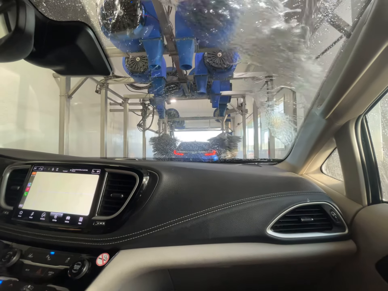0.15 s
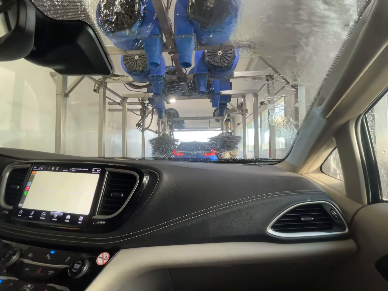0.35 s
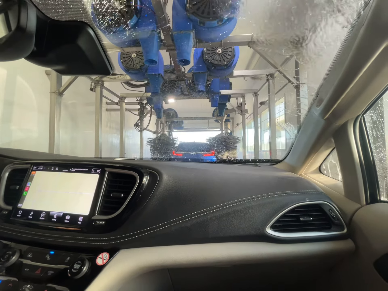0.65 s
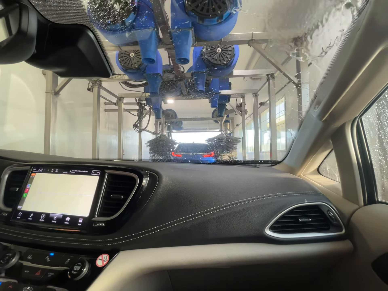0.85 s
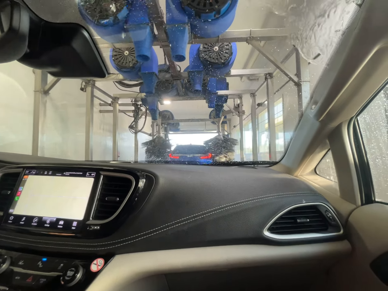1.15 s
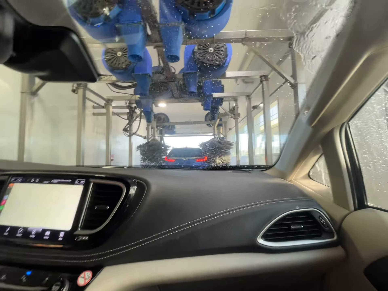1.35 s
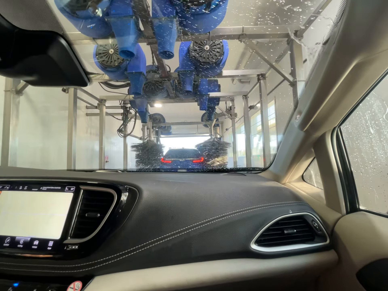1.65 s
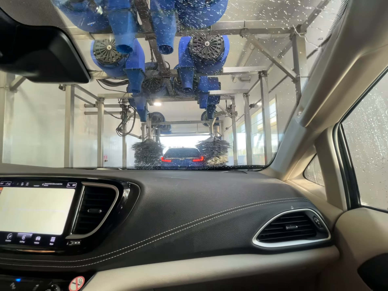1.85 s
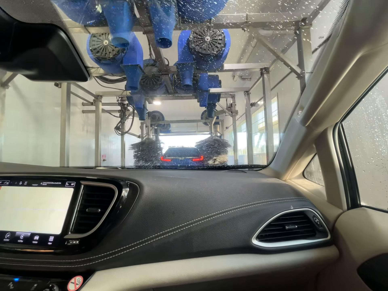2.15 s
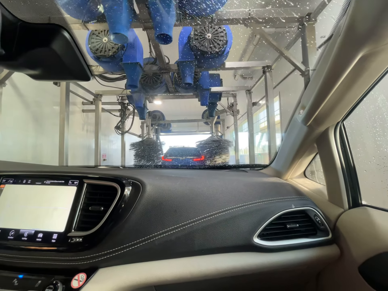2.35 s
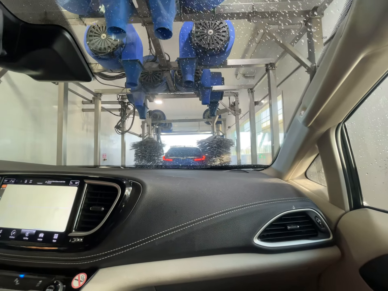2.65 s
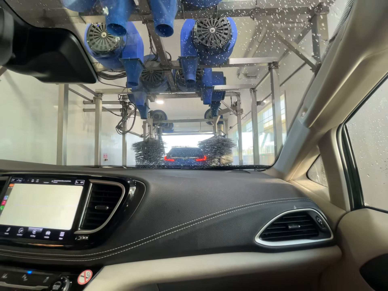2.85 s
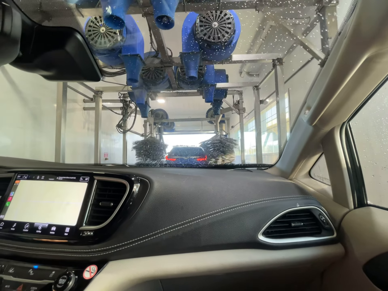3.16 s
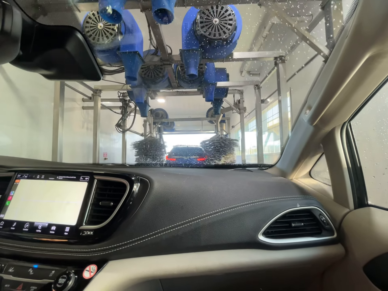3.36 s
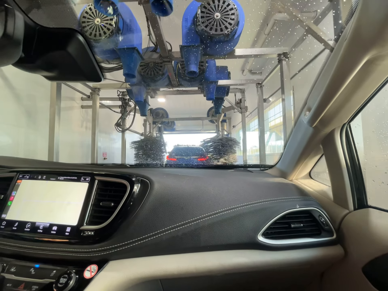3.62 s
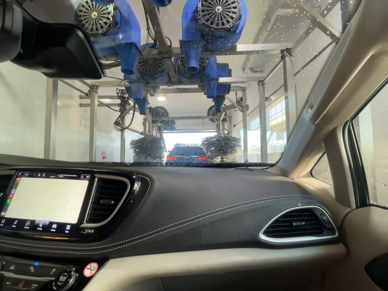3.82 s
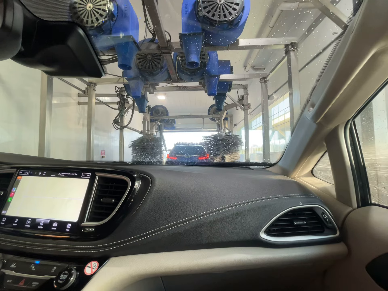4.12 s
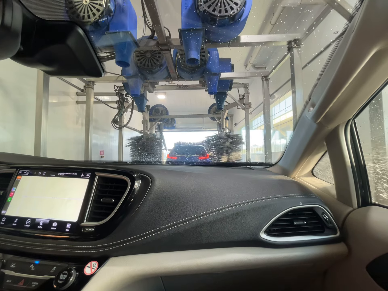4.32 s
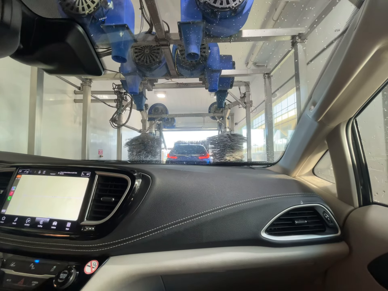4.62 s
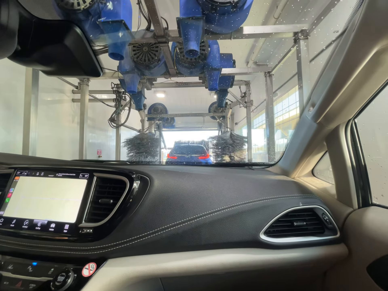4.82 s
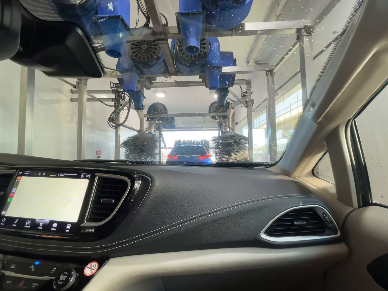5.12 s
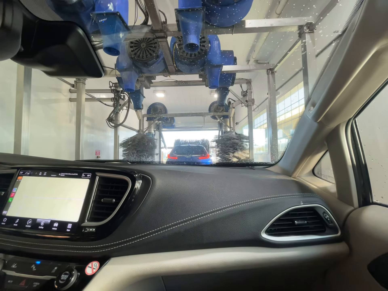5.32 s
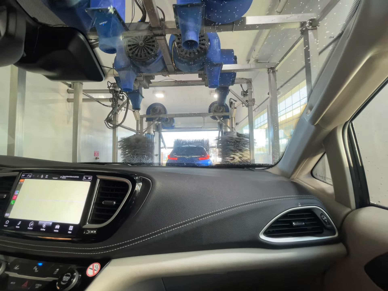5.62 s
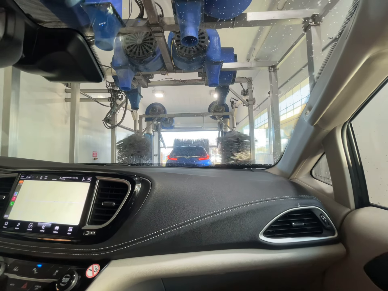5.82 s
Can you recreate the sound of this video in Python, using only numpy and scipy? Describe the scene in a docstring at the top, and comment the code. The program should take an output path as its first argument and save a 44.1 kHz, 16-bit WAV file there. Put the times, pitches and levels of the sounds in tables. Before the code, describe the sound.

The air dryers of an automatic car wash are heard from inside a closed car. From the start there is a steady rush, dulled by the glass, over a low, gusty cabin rumble. A fine hiss of air and spray lies on top, along with a faint two-tone fan whine that swells and fades. The jets drum deeply on the body panels, softly at first, then growing from about 1.3 seconds to full strength near 2.5 seconds. At that point one nozzle sweeps across the windscreen in a brief, brighter whoosh; the whine lifts for a moment and the roar deepens until just after 3 seconds. The drumming stays strong as the air moves onto the roof, continuing to the end at about 6 seconds. Faint drops tick on the windscreen near 0.3 seconds, between 1 and 2, from 4 to 4.6, and just before the end.

```python
"""Inside a car rolling under the dryer blowers of a car wash.
The air jets drum on the body panels and shake the cabin; the drumming grows as they reach the
windscreen and roof. Their rush comes dulled through the glass with a fine hiss and a faint fan whine.
One nozzle sweeps across the glass in a brief whoosh, and a few blown drops tick on the windscreen."""
import sys
import numpy as np
from scipy import signal
from scipy.fft import rfft, irfft, next_fast_len
from scipy.io import wavfile
from scipy.ndimage import uniform_filter1d, minimum_filter1d

SR = 44100
rng = np.random.default_rng(int(sys.argv[2]) if len(sys.argv) > 2 else 0)


def waveform_to_disk(signal):
    """Save audio, clipped to [-1, 1], as 16-bit WAV at the path in sys.argv[1]."""
    frames = np.transpose(np.atleast_2d(signal))
    scaled = np.clip(frames, -1, 1) * 32767
    samples = np.round(scaled).astype(np.int16)
    wavfile.write(sys.argv[1], SR, samples)


N = 263718
GUST_HZ = 4


def from_db(db):
    """Decibels to gain."""
    return 10 ** (np.asarray(db) / 20)


def rms_one(x):
    """Scale to rms 1."""
    return x / np.sqrt(np.mean(x ** 2) + 1e-20)


def in_time(rows):
    """The columns of an automation table at every sample."""
    times, *columns = np.transpose(rows)
    return [np.interp(np.arange(N) / SR, times, column) for column in columns]


def at_place(place, levels_db):
    """A level that glides between its values for bonnet, windscreen, roof front and mid-roof."""
    return np.interp(place, range(len(levels_db)), levels_db)


def swell(start_s, attack_s, hold_s, release_s):
    """An envelope from 0 to 1 and back."""
    corners = np.cumsum([start_s, attack_s, hold_s, release_s])
    return np.interp(np.arange(N) / SR, corners, [0, 1, 1, 0])


def noise(gain_at):
    """Noise of rms 1, shaped by a gain given as a function of frequency."""
    size = next_fast_len(N)
    hz = np.maximum(np.arange(size // 2 + 1) * SR / size, 1)
    spectrum = rfft(rng.standard_normal(size)) * gain_at(hz)
    return rms_one(irfft(spectrum, size)[:N])


def broad_noise(colour):
    """Turbulence with a smooth spectrum and nothing above its last point."""
    points_hz, points_db = np.transpose(colour)
    return noise(lambda hz: from_db(np.interp(np.log(hz), np.log(points_hz), points_db, right=-np.inf)))


def resonant_noise(centre_hz, width_hz):
    """Turbulence ringing in one resonance with steep skirts."""
    return noise(lambda hz: 1 / (1 + ((hz ** 2 - centre_hz ** 2) / (hz * width_hz * np.sqrt(2))) ** 2))


def drift(rate_hz):
    """A slow random wander of rms 1."""
    return noise(lambda hz: 1 / (1 + (hz / rate_hz) ** 2))


def resonate(x, centre_hz, width_hz):
    """Pass a sound through one resonance; rms 1."""
    radius = np.exp(-np.pi * width_hz / SR)
    feedback = [1, -2 * radius * np.cos(2 * np.pi * centre_hz / SR), radius * radius]
    return rms_one(signal.lfilter([1, 0, -1], feedback, x))


def steady(x, seconds):
    """Hold the slow level of a noise at 1 and keep its fast flutter."""
    return x / np.sqrt(uniform_filter1d(x ** 2, int(seconds * SR)) + 1e-12)


def crossover(x, hz):
    """Split a sound into its lows and highs."""
    lows = signal.sosfiltfilt(signal.butter(2, hz, fs=SR, output="sos"), x)
    return lows, x - lows


def drop_ticks():
    """Each drop bursts into a short spatter with a bright ring of its own and a duller glass ping."""
    # drops hitting the windscreen: (time [s], level [dB], ring [Hz])
    drops = [(.338, -54.5, 7600), (1.089, -56, 7400), (1.475, -59, 7000), (1.578, -54, 7900),
             (1.876, -54, 7400), (4.018, -48, 8300), (4.204, -53, 7900), (4.462, -54, 7600),
             (4.555, -53, 7450), (5.719, -50, 7600), (5.798, -53.5, 8300), (5.911, -55.5, 7700)]
    trim_db, ping_db = -7.0, 6.5
    tick_t60_s, ping_t60_s = .055, .05
    splash_band = signal.butter(2, [4000, 9500], "band", fs=SR, output="sos")
    ticks, t = np.zeros(N + SR), np.arange(SR // 8) / SR
    for time_s, db, ring_hz in drops:
        spatter = rng.standard_normal(len(t))
        splash = rms_one(signal.sosfilt(splash_band, spatter))
        tick = from_db(-60 * t / tick_t60_s) * (resonate(spatter, ring_hz, width_hz=550) + splash)
        ping = from_db(ping_db - 60 * t / ping_t60_s) * resonate(spatter, 5100, width_hz=700)
        start = int(time_s * SR)
        ticks[start:start + len(t)] += from_db(db + trim_db) * (tick + ping)
    treble_cut = signal.butter(12, 9400, fs=SR, output="sos")
    return signal.sosfilt(treble_cut, ticks[:N] + 1e-18)


def jet_edge():
    """The leading edge of the sweeping jet tears across the glass in a band of bright noise."""
    # colour of the edge: (frequency [Hz], level [dB per Hz])
    colour = [(1000, -20), (1450, -7), (1780, 4), (2300, -18)]
    envelope = swell(start_s=2.38, attack_s=.14, hold_s=.12, release_s=.08)
    return from_db(-41.5) * envelope * broad_noise(colour)


def air_hiss(lift_db):
    """Air and fine spray slide over the glass, brighter the harder they blow."""
    # colour of the fine turbulence: (frequency [Hz], level [dB per Hz])
    colour = [(1200, -19), (2050, -3.5), (2450, 0.5), (2750, -3), (3100, -3), (3600, -7.5), (4500, -13.5),
              (5800, -20), (7000, -24), (8500, -28), (9500, -34.5), (10300, -50.5), (12000, -55),
              (15500, -61)]
    # air and spray on the glass: (time [s], level [dB])
    spray = [(0, -42), (0.7, -43), (1.35, -43), (1.8, -43), (2.38, -43), (3.1, -42), (3.55, -40.5),
             (4.6, -40.1), (5.2, -40.5), (5.98, -41.5)]
    mean_db, brighten_db_per_db = -41, .1
    level_db = in_time(spray)[0] + lift_db
    dull, bright = crossover(broad_noise(colour), hz=3200)
    treble_db = brighten_db_per_db * (level_db - mean_db)
    flutter_db = .51 * drift(rate_hz=14)
    return from_db(level_db + flutter_db) * (dull + from_db(treble_db) * bright)


def fan_whine():
    """Two groups of fans at constant speed come and go; both swell as a nozzle points at the cabin."""
    # blade tones, smeared by the hall: (pitch [Hz], width [Hz])
    fans = [(709.2, 2.7), (739, 19)]
    # each whine as the car passes the fans: (time [s], lower tone [dB], higher tone [dB])
    levels = [(0, -46, -39.5), (0.6, -46, -43), (0.95, -43, -37), (1.3, -46, -38), (1.55, -38, -44),
              (2.2, -40, -43), (2.5, -43.5, -41.5), (3.05, -38.5, -45.5), (3.4, -45.5, -42.5),
              (4.2, -43, -41.5), (4.6, -36, -38), (5.2, -43, -38.5), (5.98, -42, -42)]
    beam_db = 7.5 * swell(start_s=2.58, attack_s=.046, hold_s=.15, release_s=.07)
    tones = [steady(resonant_noise(hz, width), seconds=.2) for hz, width in fans]
    return sum(from_db(db + beam_db) * tone for db, tone in zip(in_time(levels), tones))


def air_rush(place, lift_db):
    """The broad roar of the jets, coloured by the windows and deeper while they hit the windscreen."""
    # the rush as the glass lets it in: (frequency [Hz], level [dB per Hz])
    colour = [(150, -21.5), (275, -4), (305, 2), (430, -1.5), (560, -6.5), (740, -7.5), (830, -14),
              (1100, -12.5), (1260, -16), (1700, -17.5), (2000, -24), (2600, -30), (4500, -69),
              (9000, -100)]
    # resonances of side windows and trim: (frequency [Hz], width [Hz], level against the rush [dB])
    windows = [(301.5, 13, -19.5), (316, 22, -15), (436, 45, -15.5), (591, 21, -17.5), (663, 20, -19),
               (823, 21, -19.5), (895, 49, -21), (1049, 6.3, -27), (1392, 130, -19.5), (1466, 64, -24),
               (1730, 220, -21)]
    # low shelf on the roar: (time [s], gain [dB])
    roar = [(0, -2), (1.2, -1), (2.08, -1.5), (2.3, 0.5), (2.7, 2.5), (3.1, 2.5), (4.1, -0.1), (5.3, -0.9),
            (5.98, -2)]
    # base level by landing place: (bonnet [dB], windscreen [dB], roof front [dB], mid-roof [dB])
    levels = (-27, -25, -25, -25)
    ringing = sum(from_db(db) * resonant_noise(hz, width) for hz, width, db in windows)
    air = steady(broad_noise(colour) + ringing, seconds=.42)
    lows, highs = crossover(air, hz=460)
    roar_db, = in_time(roar)
    flutter_db = .41 * drift(rate_hz=7.7)
    return from_db(at_place(place, levels) + lift_db + flutter_db) * (highs + from_db(roar_db) * lows)


def cabin_rumble(place, lift_db):
    """The jets rock the closed cabin as a whole, in gusts."""
    # colour of the shaken cabin: (frequency [Hz], level [dB per Hz])
    colour = [(14, -36), (28, -35), (36, -28.5), (47, -8.5), (57, -4), (70, 0.5), (88, 2.5), (108, -11.5),
              (160, -37)]
    # base level by landing place: (bonnet [dB], windscreen [dB], roof front [dB], mid-roof [dB])
    levels = (-21.5, -31.5, -23.5, -22.5)
    gust_db = drift(GUST_HZ)
    return from_db(at_place(place, levels) + lift_db + gust_db) * steady(broad_noise(colour), seconds=.8)


def panel_drumming(place, force_db):
    """Eddies drive the body panels; which modes ring most depends on where the jets land."""
    # panel modes and their weight by landing place:
    # (frequency [Hz], width [Hz], bonnet [dB], windscreen [dB], roof front [dB], mid-roof [dB])
    panels = [(94.3, 8.8, 0, -12, -7.5, -6.5), (108, 13, -11, -1.5, -.5, -2), (120.3, 12, -3, -1, -7, -1.5),
              (141.4, 26, -9.5, -3.5, -3, -4.5), (164.8, 24, -2, -4, -1.5, -4.5),
              (200.5, 31.3, -2.5, -5.5, -6.5, -12.5), (228.8, 21.6, -9.5, -6, -11.5, -9.5)]
    modes = sum(from_db(at_place(place, levels)) * resonant_noise(hz, width)
                for hz, width, *levels in panels)
    gust_db = .36 * drift(GUST_HZ)
    return from_db(force_db + gust_db) * steady(modes, seconds=.13)


def scene():
    """The jets' force and landing place ride the rumble, rush and drumming; lighter layers sit on top."""
    # force on the body, growing as the car comes under the nozzles: (time [s], level [dB])
    jet_force = [(0.0, -20), (0.3, -19), (0.55, -20.5), (0.78, -21), (0.95, -22), (1.3, -21.5),
                 (1.75, -16.5), (1.95, -17.5), (2.2, -15), (2.45, -11.5), (2.62, -13.5), (2.9, -12),
                 (3.12, -15.5), (3.48, -11), (3.85, -13), (4.7, -11.5), (5.0, -13), (5.5, -13),
                 (5.98, -13.5)]
    # where the jets land: (time [s], place [0 bonnet, 1 windscreen, 2 roof front, 3 mid-roof])
    jet_place = [(0, 0), (1.2, 0.25), (1.8, 0.95), (3.0, 1.16), (3.95, 2), (4.7, 2), (5.3, 2.7), (5.98, 3)]
    force_db, = in_time(jet_force)
    place, = in_time(jet_place)
    full_force_db = -13
    push_db = force_db - full_force_db
    sweep = swell(start_s=2.4, attack_s=.13, hold_s=.23, release_s=.14)   # one nozzle crosses the glass
    rumble = cabin_rumble(place, lift_db=.14 * push_db)
    rush = air_rush(place, lift_db=.12 * push_db + .6 * sweep)
    hiss = air_hiss(lift_db=2.4 * sweep)
    whine = fan_whine()
    drops = drop_ticks()
    drumming = panel_drumming(place, force_db)
    return (drops + jet_edge() + hiss + whine + rush + rumble + drumming)[None]


def limiter(x, ceiling_db, hold_s):
    """The gain dips smoothly around each peak that would pass the ceiling."""
    span = int(hold_s * SR)
    allowed = np.minimum(1, from_db(ceiling_db) / (np.abs(x) + 1e-9))
    return x * uniform_filter1d(minimum_filter1d(allowed, span), span)


def record(dry):
    """Peaks are held down, a very faint ring-modulated image sits in the high treble, the top is cut."""
    carrier_hz, cutoff_hz = 12000, 15700
    held = limiter(dry, ceiling_db=-3.8, hold_s=.005)
    image = from_db(-66.5) * held * np.cos(2 * np.pi * carrier_hz * np.arange(N) / SR)
    high_cut = signal.ellip(12, .1, 80, cutoff_hz, fs=SR, output="sos")
    return signal.sosfilt(high_cut, held + image)


dry = scene()
out = record(dry)
waveform_to_disk(out)
```